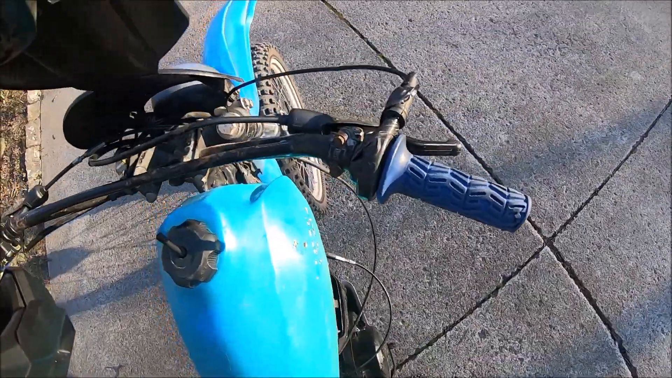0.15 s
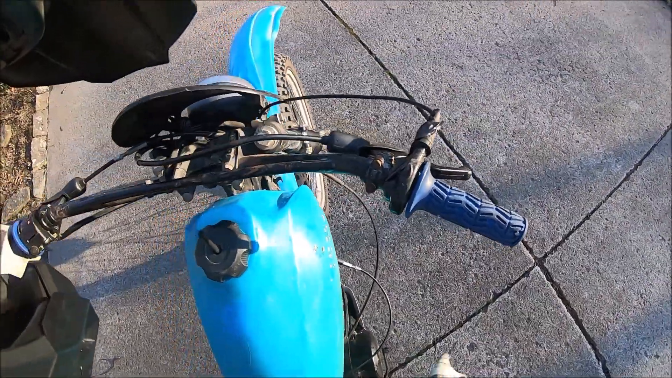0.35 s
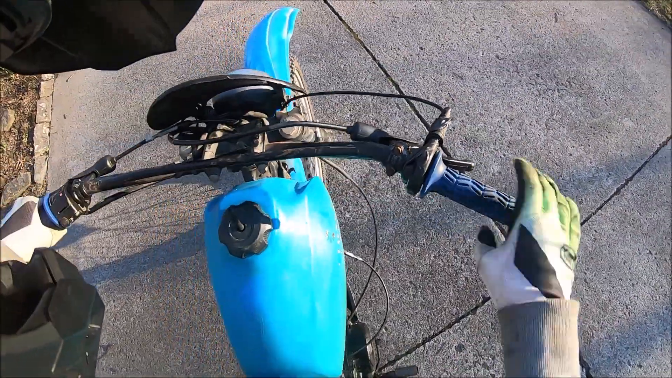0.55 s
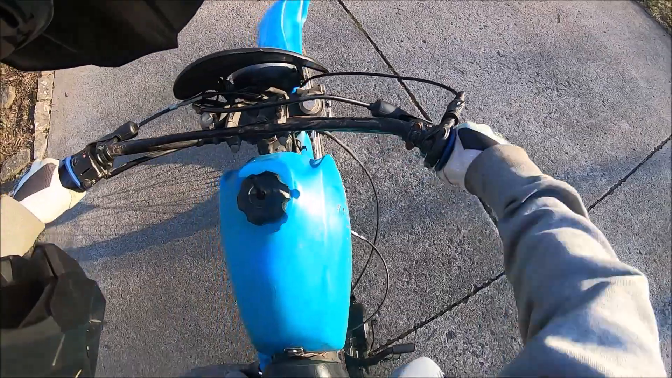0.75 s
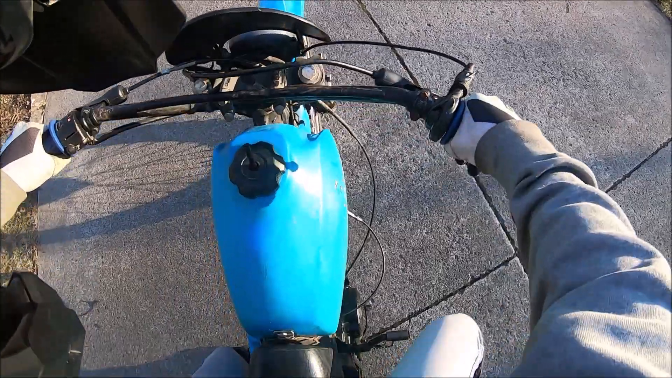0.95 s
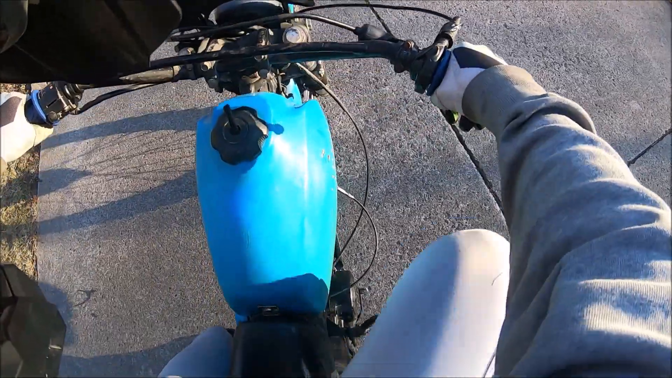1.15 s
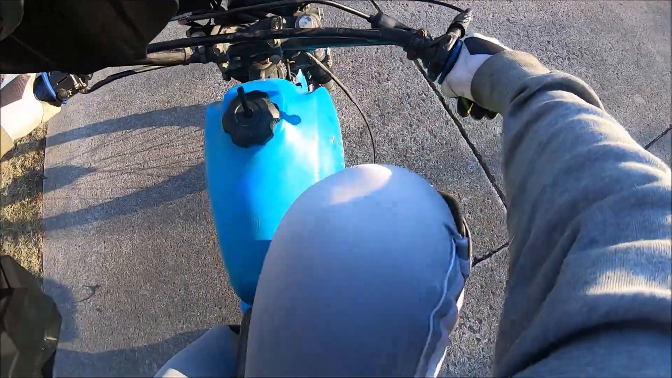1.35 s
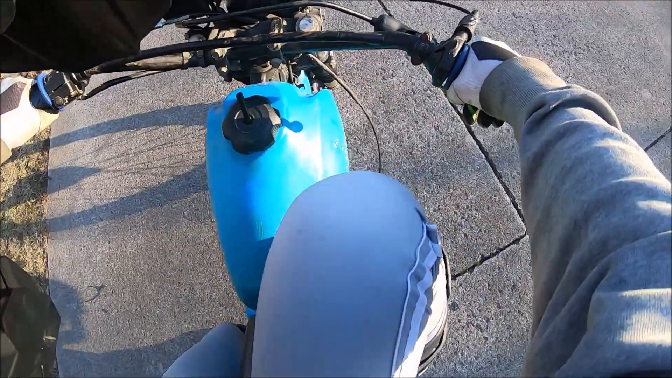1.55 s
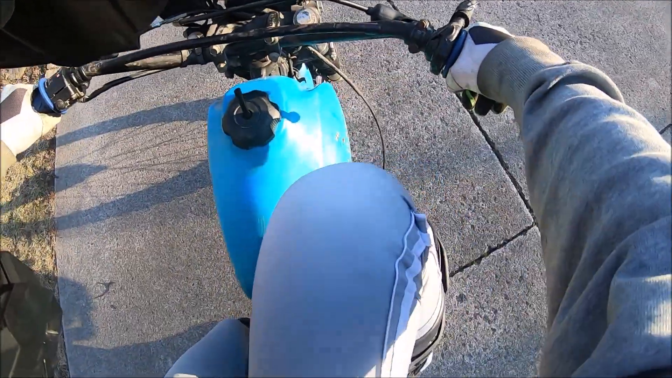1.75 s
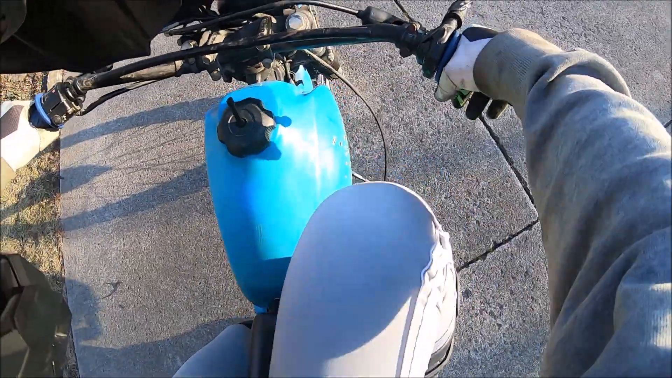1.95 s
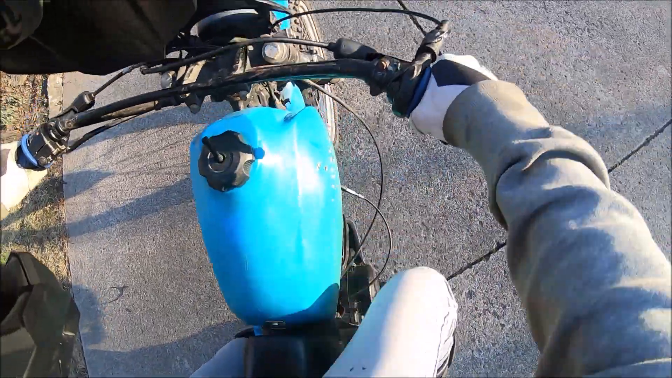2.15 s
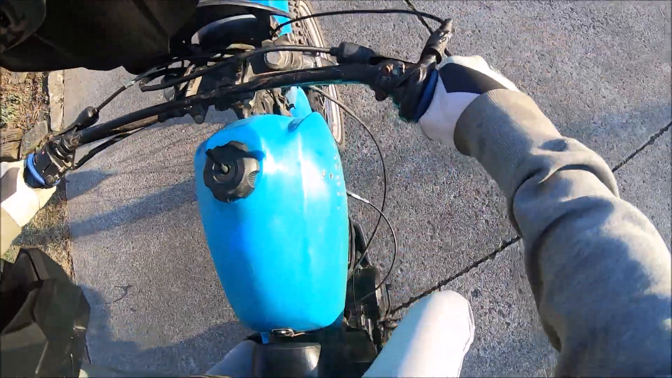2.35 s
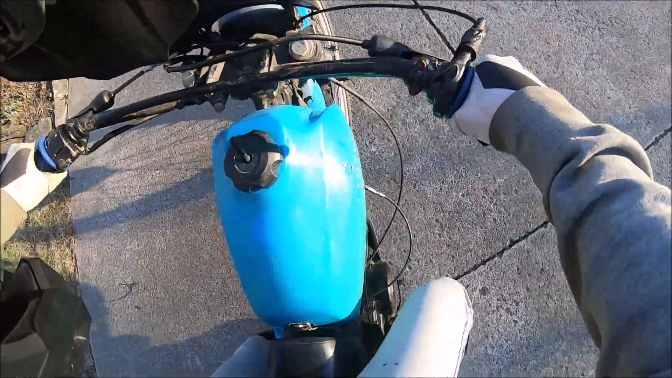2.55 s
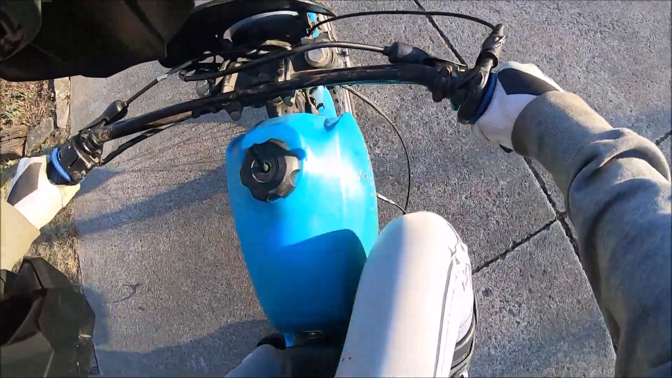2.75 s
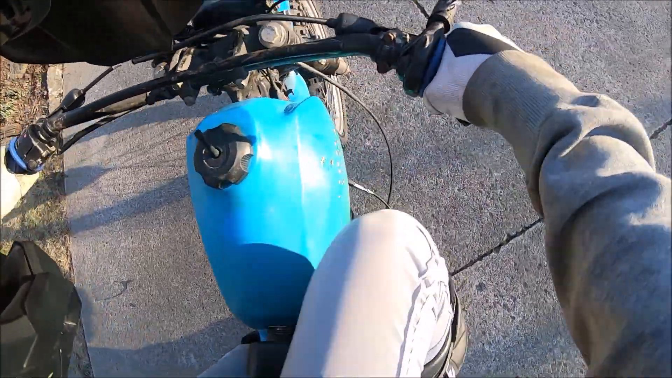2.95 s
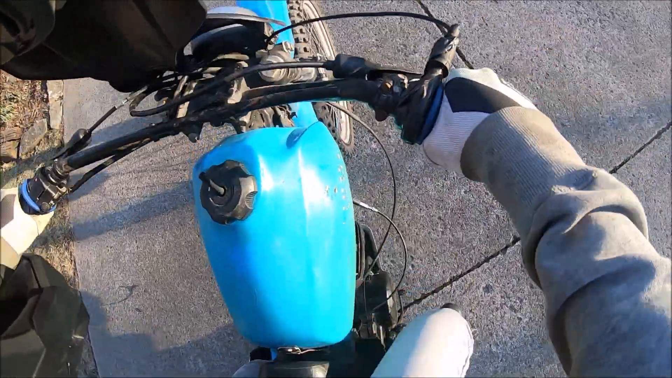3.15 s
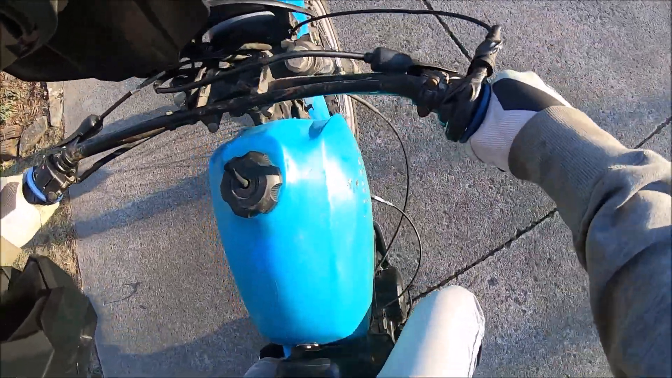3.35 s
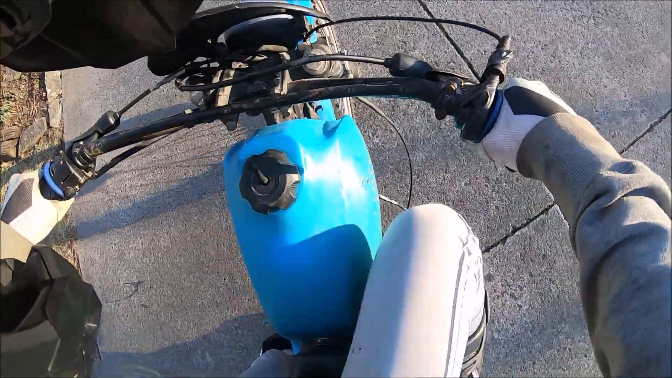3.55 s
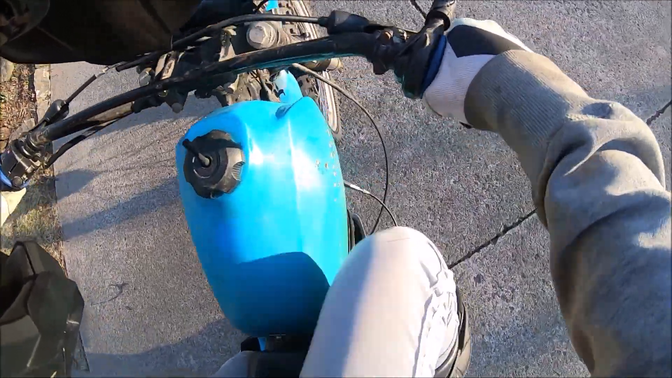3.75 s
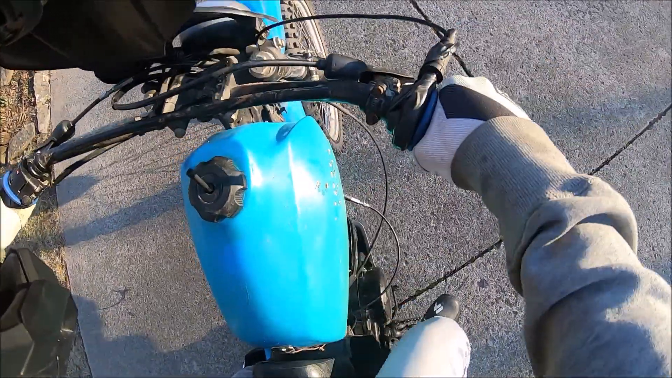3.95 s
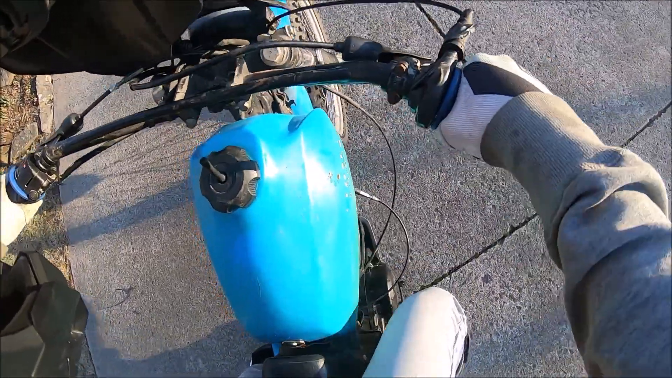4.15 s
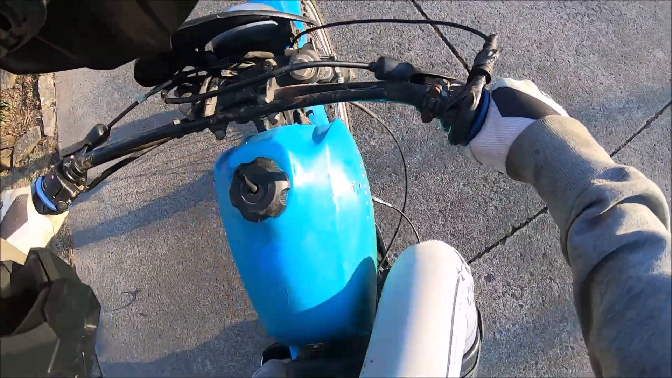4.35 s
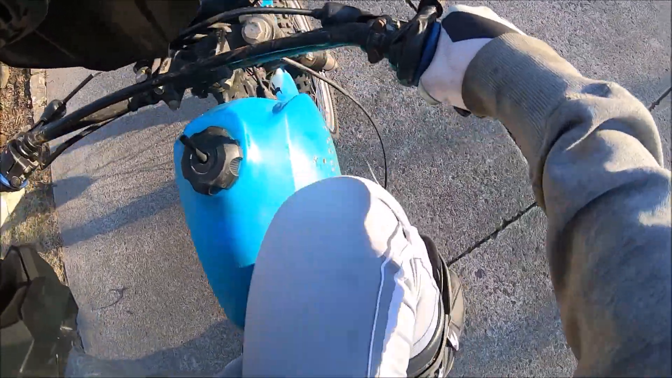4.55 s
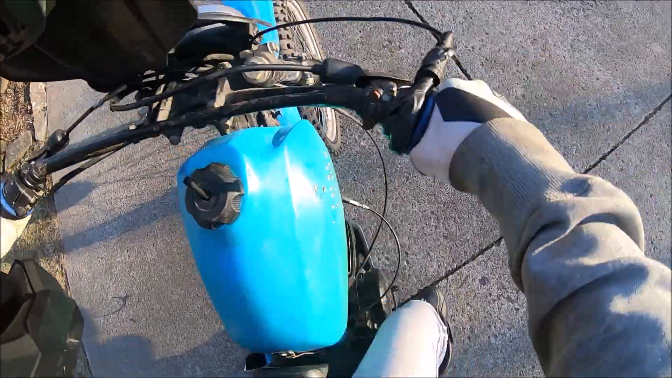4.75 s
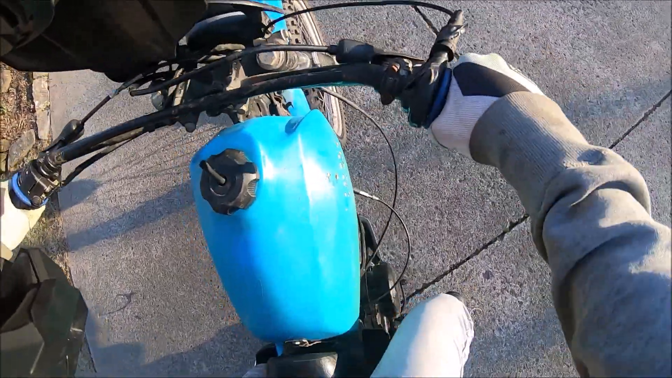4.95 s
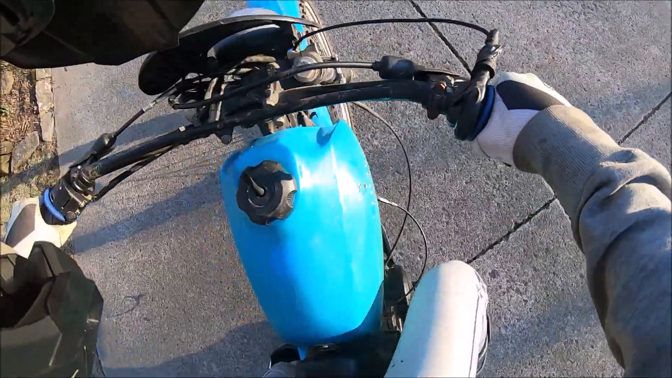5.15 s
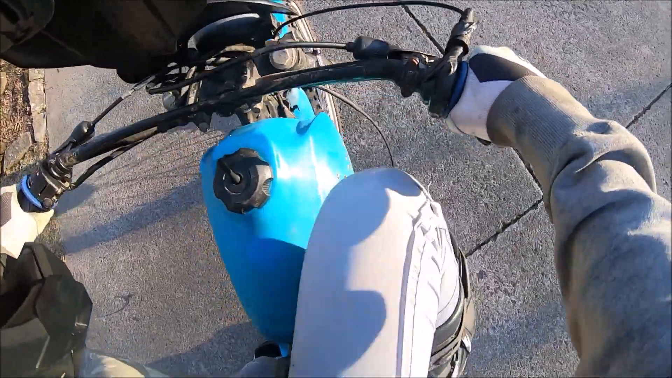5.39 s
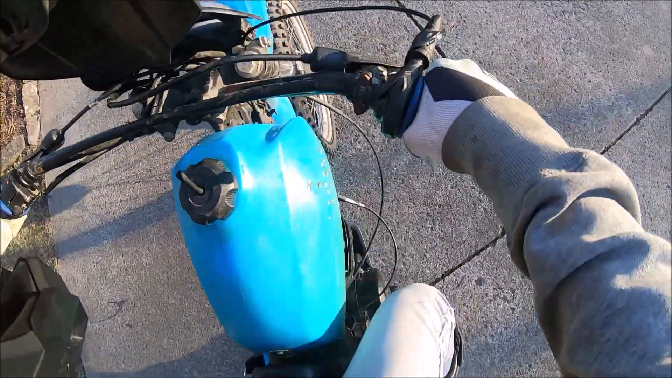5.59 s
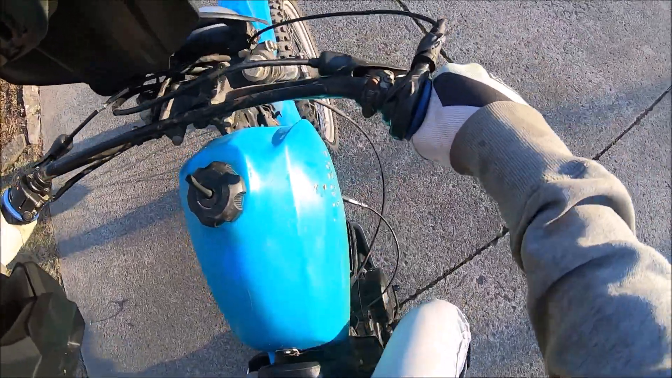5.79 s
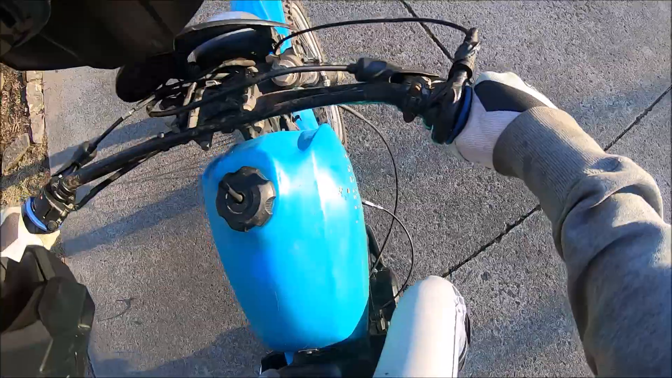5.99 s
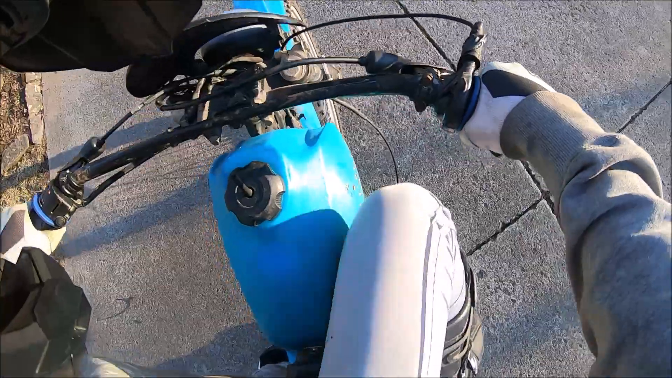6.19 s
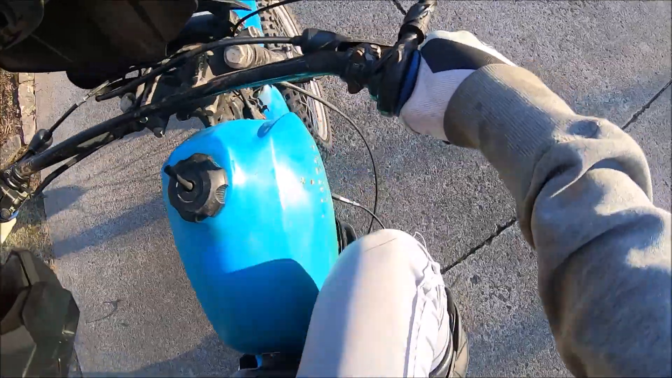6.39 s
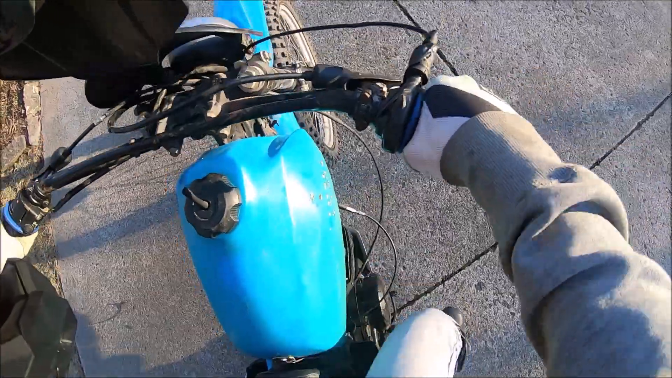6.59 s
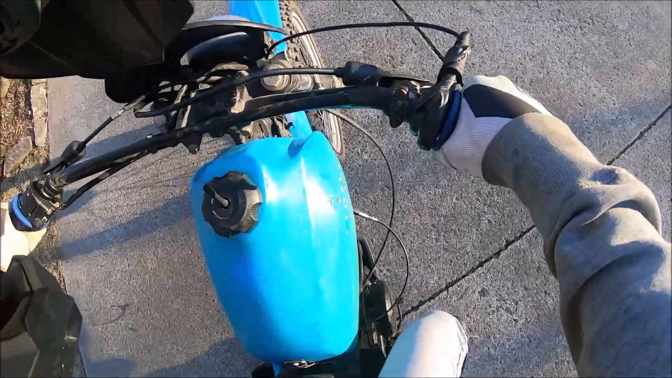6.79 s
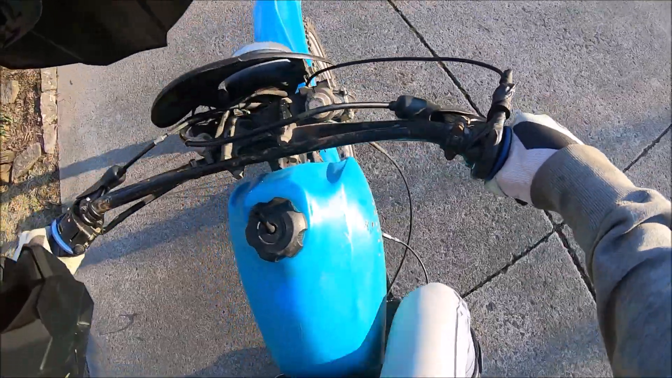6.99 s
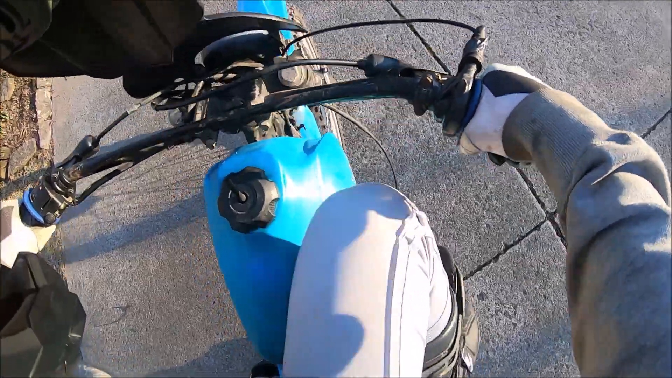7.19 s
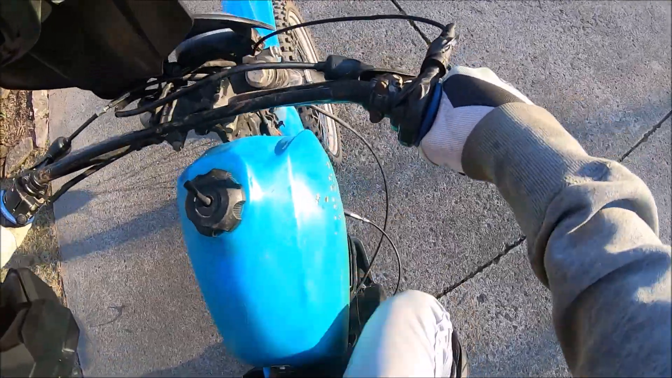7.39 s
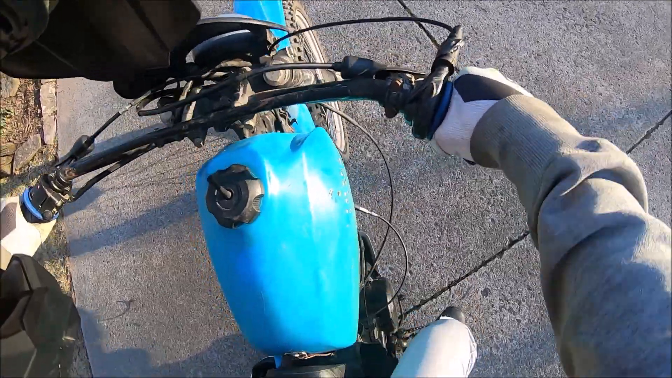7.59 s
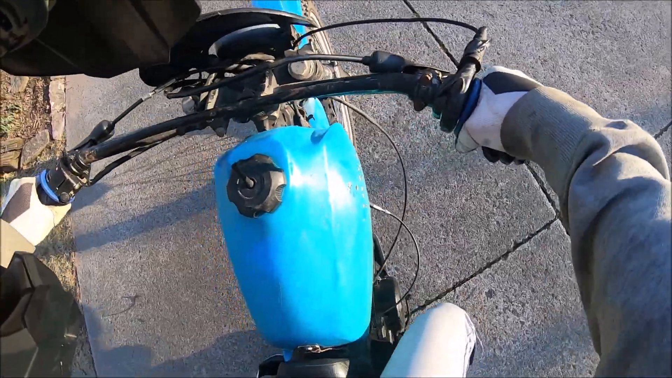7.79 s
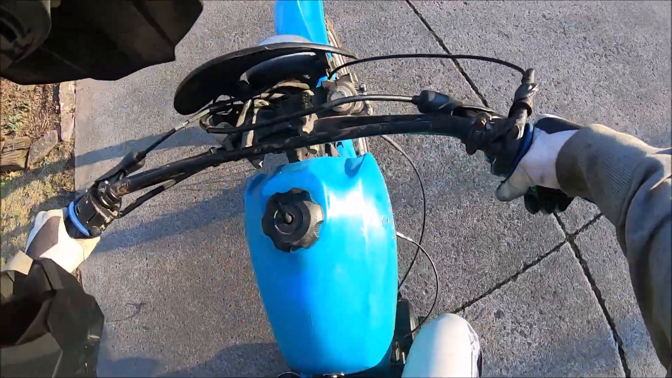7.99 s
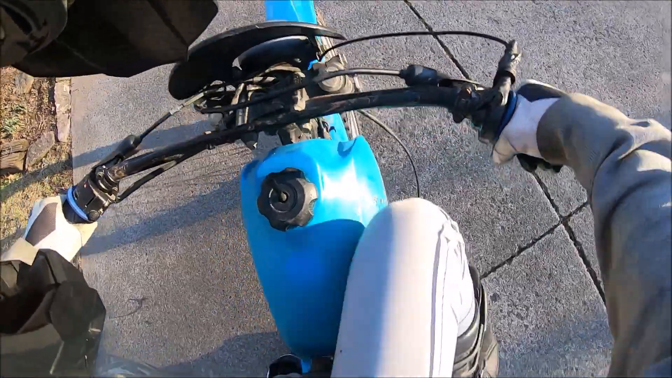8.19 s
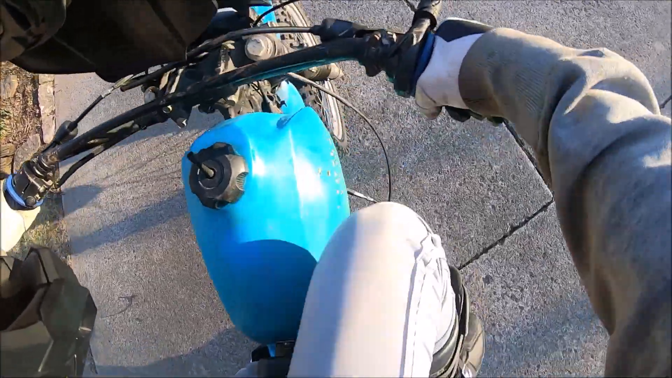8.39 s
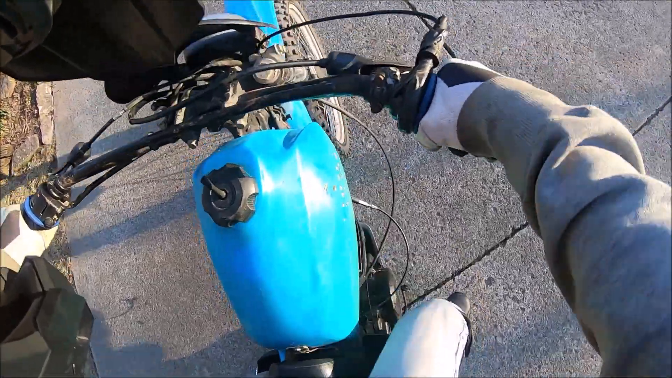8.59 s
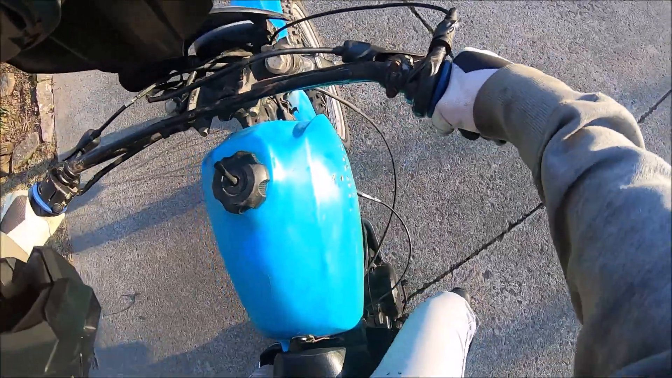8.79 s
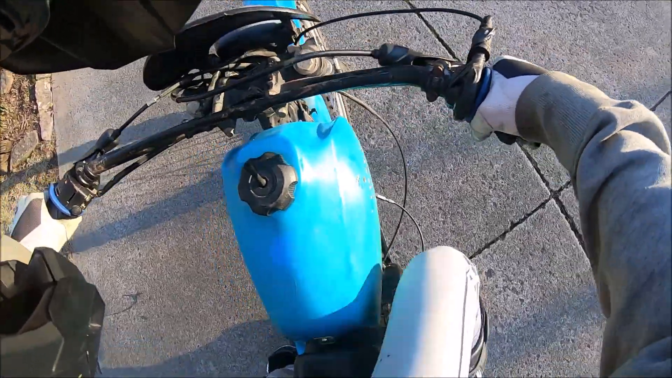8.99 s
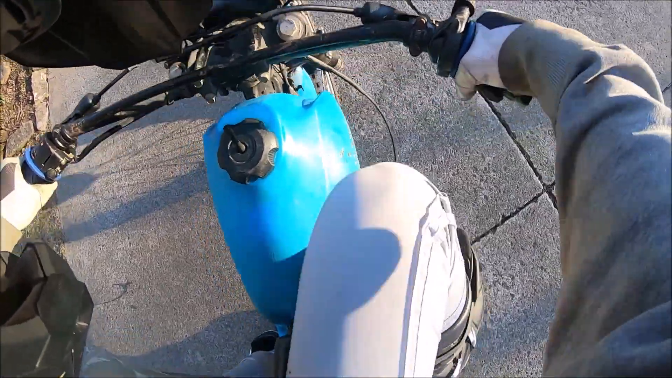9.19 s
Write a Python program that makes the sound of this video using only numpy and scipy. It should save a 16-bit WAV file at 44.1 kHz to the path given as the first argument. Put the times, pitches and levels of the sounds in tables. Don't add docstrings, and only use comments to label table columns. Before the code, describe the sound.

Repeated kick-starter strokes on a small motorcycle: gear grind, hollow exhaust chuffs, sharp steel bang, ratchet clicks on the return, no ignition.

```python
import sys
import numpy as np
from scipy import signal
from scipy.fft import rfft, irfft, next_fast_len
from scipy.io import wavfile
from scipy.ndimage import map_coordinates

SR = 44100
rng = np.random.default_rng(int(sys.argv[2]) if len(sys.argv) > 2 else 0)


def rack_gain(trim_db):
    fader = np.asarray(trim_db, float)
    return 10 ** (fader / 20)


def inscribe(sig):
    pcm = np.round(np.clip(np.atleast_2d(sig).T, -1, 1) * 32767)
    wavfile.write(sys.argv[1], SR, pcm.astype(np.int16))


N = 407250

# [t/s, level/dB]
BREEZE = [(0, -50.5), (.5, -53), (1, -51), (1.3, -43.5), (1.5, -50), (2, -53), (2.7, -59), (4.35, -56),
          (5.35, -63), (6.2, -59.5), (8.1, -63), (8.4, -63), (9.23, -55)]
# [t/s, level/dB]
TRAFFIC = [(0, -57), (.35, -57), (1, -49.5), (1.3, -54), (2.7, -52), (5.35, -54), (8.1, -52.5),
           (9.23, -54.5)]
# [f/Hz, level/dB per Hz]
WIND = [(12, -32.5), (20, -9), (59, -3), (156, -3), (400, -25), (520, -52.5), (880, -120)]
# [f/Hz, level/dB per Hz]
FAR = [(120, -25.5), (200, -6), (525, -6.5), (661, -7), (741, -7.5), (1500, -13.5), (3030, -24),
       (10000, -45.5), (13000, -89.5), (22000, -120)]
# [f/Hz, level/dB per Hz]
CLOTH = [(600, -10), (1500, 8), (2250, -9), (2900, 3.5), (3500, -8), (5500, -16.5), (8500, -12.5),
         (12000, -23.5)]
REACH_S, SWELL_S, HOLD_S, FADE_S, RUSTLE_DB, HUSH_DB = .1, .45, .6, .45, -57.5, 23

# [t/s, peak level/dB, weight (0 light, 1 heavy), favoured f/Hz]
KNOCKS = [(2.2444, -19.5, 0.8, 2070), (2.358, -29, 0.3, 1410), (2.3868, -24, 0.15, 1560),
          (2.42, -33, 0.2, 3080), (3.129, -16.5, 0.1, 1200), (3.3374, -26.5, 0.95, 710),
          (4.0302, -34, 0.05, 2820), (4.0624, -21, 0.3, 1370), (4.1325, -18, 0.1, 1410),
          (4.8908, -26.5, 0.4, 1450), (4.973, -28.5, 0.05, 2940), (5.008, -34, 0.05, 3800),
          (5.0615, -27.5, 0.05, 2340), (5.6444, -26.5, 0.7, 3170), (5.7557, -19.5, 0.1, 1440),
          (5.82, -34, 0.1, 1570), (5.848, -31, 0.15, 3800), (5.908, -36, 0.1, 3670),
          (6.5337, -19, 0.6, 3150), (6.658, -24, 0.5, 1880), (6.76, -32, 0.9, 750),
          (6.7852, -32, 0.95, 1170), (7.432, -26, 0.5, 2070), (7.4506, -16, 0.1, 2080),
          (7.6611, -16.5, 0.7, 720), (7.6725, -19, 0.6, 1400), (7.6968, -12.5, 0.05, 1350),
          (7.7767, -36, 1.05, 1210), (8.533, -18, 0.35, 2680), (8.684, -17.5, 0.3, 1410),
          (8.7094, -20, 0.6, 970), (8.7633, -20.5, 0.6, 2070), (8.7883, -21.5, 0.2, 1660),
          (8.853, -13, 0.02, 3100), (8.8902, -19, 0.02, 2720)]
# [t/s, peak level/dB, weight, favoured
# f/Hz]
BUMPS = [(0.0527, -26, 0.75, 1800), (0.373, -42, 0.35, 1570), (1.5423, -24.5, 0.9, 1170),
         (1.946, -45.5, 1.2, 690), (3.4144, -41, 0.4, 660), (5.0992, -18.5, 0.15, 1340),
         (5.1197, -21, 0.25, 1340), (6.045, -44, 0.8, 730), (6.275, -44, 0.9, 660),
         (6.892, -42, 1.05, 2080), (7.9771, -13.5, 0.02, 1340), (9.1456, -31, 0.5, 1680)]
# [t/s, peak level/dB, favoured f/Hz]
RATTLES = [(0.2833, -45, 1780), (0.8909, -38, 1420), (0.9664, -39, 1580), (1.0216, -37, 1210),
           (1.0424, -39, 1180), (1.1174, -39, 2340), (1.2994, -41, 1990), (1.4484, -39, 1360),
           (1.6342, -40, 1970), (1.9215, -41, 1140), (2.5451, -38, 2160), (2.6204, -42, 1330),
           (2.6998, -41, 1330), (4.5456, -43, 1620), (4.5775, -33, 1130), (6.9194, -44, 1210),
           (6.9681, -43, 1190), (6.988, -42, 2360), (7.2025, -43, 1850), (7.2744, -43, 1740),
           (7.8915, -41, 1390), (7.9144, -48, 1350), (7.9244, -45, 1140), (8.0494, -42, 1590)]
RATTLE_DB, RATTLE_WEIGHT = -6.5, .2
# [low level/dB, treble level/dB, t60/s]
LIGHT = (-14, -6, .035)
# [low level/dB, treble level/dB, t60/s]
HEAVY = (2, -21, .075)
# [low level/dB, treble level/dB, t60/s, favoured f/Hz]
ENGAGING = (2.5, -26, .08, 1200)
# [f/Hz, width/Hz, level/dB]
CASE = [(1184, 25.3, -8), (1344, 40, 1.5), (1666, 112, -5.5), (2068, 36, -2.5), (2800, 17, -13),
        (3127, 43, -4.5), (3800, 12, -61.5), (5830, 43, -8.5), (6580, 48, -9.5)]
# [width/Hz, level/dB]
STRUCK = (150, 3)
TAIL_DB, TAIL_LONGER, TAIL_HZ = -10.5, 2.8, 1600

# [t/s, f/Hz, level/dB]
BIRDS = [
    [(1.11, 2250, -64), (1.14, 2460, -54), (1.17, 2340, -57), (1.2, 2170, -59), (1.3, 2010, -58),
     (1.4, 1960, -57), (1.49, 1920, -60)],
    [(1.3, 1510, -64), (1.4, 1460, -56), (1.45, 1390, -54), (1.5, 1280, -53)],
    [(.28, 1280, -62), (.33, 1215, -61), (.47, 1210, -66)],
    [(.51, 1240, -62), (.62, 1195, -62), (.91, 1185, -63)],
    [(.99, 1290, -62), (1.05, 1160, -62)],
    [(.66, 1400, -64), (.76, 1440, -63), (.8, 1580, -63), (1.03, 1540, -64)],
]
# [t/s, f/Hz, level/dB]
CAW = [(1.16, 511, -75), (1.22, 508, -57), (1.4, 497, -62.5), (1.68, 494, -66)]
# [multiple, level/dB]
CAW_ORDERS = [(2, 2), (4, -3.5), (5, -2), (6, -10.5)]
# [t from its start/s, f/Hz, level/dB]
SONG = [
    [(0, 4400, -3), (.022, 4010, -2), (.05, 3930, -1.5)],
    [(.07, 3600, -4), (.18, 3290, -4), (.29, 2800, 5), (.325, 2780, 7)],
]
# [t/s, level/dB]
SUNG = [(1.797, -64), (2.74, -67), (3.69, -66)]
# [t from its start/s, f/Hz, level/dB]
CHIRP = [(0, 5450, -.5), (.028, 4350, -3)]
# [t/s, level/dB]
CHIRPED = [(1.775, -64), (3.735, -64)]

# [gear engages t/s, engaging knock level/dB, crank stalls t/s, grind level at full speed/dB,
# case rumble level at the stall/dB]
KICKS = [
    (2.138, -31, 2.43, -34.5, -40),
    (3.04, -20, 3.38, -38.5, -46),
    (3.8355, -19.5, 4.15, -37, -39),
    (4.6642, -31.5, 5.03, -38.5, -46),
    (5.5596, -24.5, 5.9, -39, -52),
    (6.4378, -28.5, 6.78, -36.5, -42),
    (7.3554, -27.5, 7.72, -34, -43),
    (8.4274, -25, 8.95, -31.5, -36),
]
FASTEST_AFTER_S, STALL_S, COAST_S, SAG_DB_PER_S = .025, .12, .22, 14
GRIND_SLOW_DB, GRIND_STALL_DB, GRIND_END_DB = -48, -46, -63
RUMBLE_UNDER_DB, RUMBLE_FULL_DB, RUMBLE_SAG, RUMBLE_END_DB = 11.5, -30, .4, -61
HUSHED_DB, HUSHED_S = -6, .045
# [f/Hz, level/dB per Hz]
GRIND = [(240, -27), (400, 7.5), (934, 1.5), (1130, -0.5), (2290, -5.5), (2750, -7), (4000, -19.5),
         (5200, -41), (8800, -120)]
# [f/Hz, level/dB per Hz]
HISS = [(1470, -45), (2500, -13), (2700, -10), (4450, -18), (9670, -31), (15700, -58.5)]
# [f/Hz, level/dB per Hz]
RUMBLE = [(40, -11.5), (95, -10.5), (150, -8.5), (260, -5.5), (400, -11.5), (600, -28.5), (1000, -57.5)]

# [t/s, upper pipe tones level/dB, lowest pipe tone level/dB]
PUFFS = [(2.271, -6, -15.5), (2.38, -14, -14), (3.142, -4.5, -12), (3.237, -14.5, -13), (3.349, -10, -18.5),
         (3.944, -6, -12), (4.024, -13, -13), (4.11, -19, -27.5), (4.788, -3, -13), (5.653, -6, -15),
         (6.543, -6, -15.5), (7.462, -4, -12.5), (7.562, -10, -12.5), (7.668, -5, -12), (7.773, -31, -53),
         (8.543, -6.5, -15.5), (8.632, -14, -10), (8.704, -7, -9.5), (8.773, -5.5, -14.5),
         (8.872, -4, -12.5), (8.957, -23, -25), (9.0, -33, -26)]
# [f/Hz, level/dB, t60/s]
PIPE = [(95.7, 0.5, .12), (258.8, 7, 0.048), (385.6, -0.5, 0.061), (515, -16, 0.12), (178, -13, 0.099)]
FIRST_RING, LATER_RING = .78, .65
NUDGE_AFTER_S, NUDGE_DB, NUDGE_LOW_DB, NUDGE_RING = .004, -21, -45, .8

# [t/s, peak level/dB, low
# level/dB, length/s, favoured f/Hz]
GULPS = [(2.1947, -16, -2.5, 0.043, 2770), (3.07, -14, -2, 0.044, 1120), (3.247, -19.5, -27, 0.035, 3180),
         (3.2765, -19.5, -40, 0.025, 2810), (3.3353, -23, 6.5, 0.04, 700), (3.8854, -12, -3, 0.046, 2790),
         (3.993, -21.5, -21, 0.024, 2370), (4.048, -18, -22, 0.039, 3080),
         (4.0962, -15.5, 0.5, 0.053, 1350), (4.7136, -21, -2.5, 0.047, 2850),
         (5.5826, -19, -3.5, 0.025, 3500), (6.4617, -22, 1.5, 0.025, 1110), (7.378, -22, 4, 0.025, 1590),
         (7.5806, -13.5, -9, 0.04, 3050), (8.1937, -31, 0.2, 0.1, 720), (8.4525, -23, 4.5, 0.032, 1550),
         (8.666, -18, -12, 0.02, 2650), (8.73, -10.5, -14, 0.036, 2780), (8.8036, -10, -31, 0.025, 2680),
         (8.9057, -15.5, -27, 0.043, 2800), (8.9562, -24, 7, 0.034, 1310)]
STARTING_TREBLE_DB, SPINNING_TREBLE_DB = -19, -12
CHARGE_LEAD_S = .031
CHARGE = -15.5, 3, -21, .044, 2070
# [low level/dB, treble level/dB, length/s, favoured f/Hz]
SQUEEZED = (-11, -15, .035, 2720)
# [f/Hz, width/Hz, level/dB]
INTAKE = [(1200, 150, -2), (1600, 90, -2), (2050, 90, -2), (2800, 90, 5), (3500, 130, -2), (5800, 250, 5),
          (6600, 150, 5), (7300, 200, 4), (9800, 600, 5)]
# [width/Hz, level/dB]
BLOWN = (120, 7)

# [t/s, peak level/dB, thud level/dB, level of air squeezed out before/dB, its lead/s]
BANGS = [
    (2.3011, -6, -6, -40, .025),
    (3.1767, -5.5, -13, -14.5, .022),
    (3.9545, -6, -13, -40, .025),
    (4.8309, -4, -9.5, -18.5, .021),
    (5.7062, -5.5, -9.5, -9.5, .02),
    (6.5978, -9, -11.5, -12, .026),
    (7.5262, -10.5, -13, -9, .029),
    (8.6148, -8.5, -8, -8, .031),
]
# [low modes level/dB, middle modes level/dB, high modes level/dB]
LANDINGS = [(3, -2, -4), (-1, -2, 0), (-3, -2, 0), (-1, 2, 1), (-1, 2, -2), (2, 3, -8), (2, 2, -11),
            (1, 1, -11)]
# [f/Hz, level/dB, t60/s]
STOP = [(1375, -1.5, .045), (1870, -4, .02), (2350, -5, .018), (2900, -5, .018), (3640, 5, .019),
        (4300, -3, .012), (7050, -15, .015), (9200, -18, .015)]
# [f/Hz, level/dB, t60/s]
FRAME = [(272, 8, 0.041), (105.6, -2, 0.1)]
FIRST_CONTACT = 14

# [peak level/dB, t/s of each tooth]
PAWL = [
    (-26.5, 2.7312, 2.797, 2.8814),
    (-27.5, 3.5638, 3.6576),
    (-27, 4.4144, 4.4922, 4.6009),
    (-28.5, 5.252, 5.3298, 5.4261),
    (-26.5, 6.1384, 6.2133, 6.3116),
    (-25.5, 7.0623, 7.1417, 7.2424),
    (-24, 8.113, 8.1753, 8.2477, 8.3404),
]
# [level/dB, low level/dB]
TEETH = [(-2.5, -7), (-1.5, -10), (-1.5, -5), (-3.5, -5.5)]
TOOTH_HZ = [3180, 1710, 1710, 3180]
TOOTH_TREBLE_DB, TOOTH_T60_S = -9, .045
# [f/Hz, width/Hz, level/dB]
RATCHET = [(716, 200, -6), (1280, 200, -3), (1710, 130, -8), (3180, 200, -5), (4280, 110, -10),
           (5290, 160, -9), (6030, 120, -8)]

# [t/s, first mode level/dB, second mode level/dB]
SHIELD = [(3.128, -57, -30.5), (3.932, -60, -28), (3.99, -48, -60), (4.12, -52, -56), (4.85, -50, -56),
          (4.93, -50, -58), (4.965, -52, -47), (6.67, -50, -60), (5.822, -45, -48), (7.53, -42, -55),
          (7.7, -55, -63)]
# [f/Hz, level/dB, t60/s]
SHEET = [(5725, -2.5, 0.6), (7685, -1, .2), (10400, -5, .15)]
# [t/s, f/Hz, #
# level/dB, t60/s]
SPRING = [(3.355, 662, -36, .34), (3.36, 1585, -46, .6), (4.15, 1250, -48, .4), (4.3, 1780, -54, .4),
          (5.84, 1588, -46, .5), (6.787, 1200, -38, .15), (7.7, 1330, -38, .2), (7.77, 1590, -48, .5),
          (8.195, 2300, -44, .3)]

# [f/Hz, level/dB]
WIDTH = [(30, -5.5), (80, -19), (300, -23.5), (700, -10.5), (1300, -4.5), (4000, -6), (9000, 2)]
# [f/Hz, share of mid]
LEAN = [(200, 0.012), (1000, 0.085), (5000, 0.14), (12000, .1)]
# [f/Hz, level/dB]
MICROPHONE = [(30, 3), (10300, 0), (11200, -15.5), (15000, -10), (16000, -26.5)]


def unit(x):
    return x / np.sqrt(np.mean(x ** 2) + 1e-20)


def along(points, hz):
    f, v = np.transpose(points)
    return np.interp(np.log(hz + 1), np.log(f + 1), v)


def curves(rows, outside=None):
    s, *columns = np.transpose(rows)
    t = np.arange(N) / SR
    return [np.interp(t, s, column, outside, outside) for column in columns]


def wobble(rate):
    coarse = np.arange(0, N + 16, 16)
    knots = rng.standard_normal(int(N * rate / SR) + 4)
    return np.interp(np.arange(N), coarse, map_coordinates(knots, [coarse * rate / SR]))


def filtered(x, response):
    n = x.shape[-1]
    m = next_fast_len(n + 2048)
    return irfft(rfft(x, m) * response(np.fft.rfftfreq(m, 1 / SR)), m)[..., :n]


def noise(spectrum, grain_db=0, rate=300):
    pair = rng.standard_normal((2, N)) * rack_gain(grain_db * wobble(rate))
    return unit(filtered(pair, lambda hz: rack_gain(along(spectrum, hz))))


def add(out, s, piece):
    i = round(s * SR)
    out[:, i:i + piece.shape[1]] += piece[:, :N - i]


def ring(modes, t, levels_db, stretch=0.83, attack=.001):
    total = np.zeros(len(t))
    for (hz, db, t60), more_db in zip(modes, levels_db):
        total += rack_gain(db + more_db - 60 * t / (t60 * stretch)) * np.sin(2 * np.pi * hz * t)
    return total * (1 - np.exp(-t / attack))


def resonant(peaks, f, flat=0.33, more_db=0):
    centre, width, db = np.transpose(peaks)[:, :, None]
    signs = (-1) ** np.arange(len(peaks))[:, None]
    damping = 1j * f * width
    peak = damping / (centre * centre - f * f + damping)
    return flat + np.sum(signs * rack_gain(db + more_db) * peak, axis=0)


def colour(low_db, treble_db, hz):
    points = [(100, 2 * low_db - 13), (300, 2 * low_db + 12.5), (900, low_db + 10.5), (1400, 0.02), (3600, 0),
              (5400, treble_db), (10000, treble_db - 13), (16000, treble_db - 25)]
    return rack_gain(along(points, hz))


def surroundings():
    (wind_db,), (far_db,) = curves(BREEZE), curves(TRAFFIC)
    times = np.cumsum([REACH_S, SWELL_S, HOLD_S, FADE_S])
    rustle_db, = curves(np.c_[times, RUSTLE_DB - HUSH_DB * np.array([1, 0, 0, 1])], outside=-120)
    wind = rack_gain(wind_db + 4.0 + 2.3 * wobble(9)) * noise(WIND)
    far = rack_gain(far_db + 0.45 * wobble(6)) * noise(FAR, grain_db=0.53, rate=120)
    rustle = rack_gain(rustle_db + 2.4 * wobble(22)) * noise(CLOTH, grain_db=3, rate=230)
    return wind + far + rustle


def strike(out, row, body):
    s, db, low_db, treble_db, t60, tone_hz = row
    t = np.arange(SR // 10) / SR
    fall_db = -60 * t / t60
    decays = rack_gain([[fall_db], [TAIL_DB + fall_db / TAIL_LONGER]])
    parts = rng.standard_normal((2, 2, len(t))) * [[1], [.7]] * decays * (1 - np.exp(-t / 0.0018))
    place_db = rng.normal(0, 2.5, (len(body), 1))

    def response(hz):
        dulling = np.array([[1 + 0 * hz], [1 + (hz / TAIL_HZ) ** 4]])
        rung = colour(low_db, treble_db, hz) * resonant(body, hz, 0.42, place_db)
        return (rung + resonant([(tone_hz, *STRUCK)], hz, 0)) / dulling

    add(out, s - .001, rack_gain(db + 11) * filtered(parts, response).sum(axis=0))


def blows():
    rattles = [(s, db + RATTLE_DB, RATTLE_WEIGHT, hz) for s, db, hz in RATTLES]
    rows = []
    for s, db, weight, hz in KNOCKS + BUMPS + rattles:
        rows.append((s, db, *(np.array(LIGHT) + weight * np.subtract(HEAVY, LIGHT)), hz))
    return rows + [(s, db - 1.5, *ENGAGING) for s, db, *_ in KICKS]


def knocks():
    out = np.zeros((2, N))
    for row in blows():
        strike(out, row, CASE)
    return out


def whistle(rows, orders, waver, flutter):
    s, hz, db = np.transpose(rows)
    span = np.arange(round(s[0] * SR), round(s[-1] * SR))
    t = span / SR
    phase = 2 * np.pi * np.cumsum(np.interp(t, s, hz) * (1 + waver[span])) / SR
    edges = signal.windows.tukey(len(span), min(1, 900 / len(span)))
    gain = rack_gain(np.interp(t, s, db)) * flutter[span] * edges
    return np.sqrt(2) * gain * sum(rack_gain(level) * np.sin(k * phase) for k, level in orders)


def birds():
    out, waver, flutter = np.zeros((2, N)), .008 * wobble(70), rack_gain(1.6 * wobble(50))
    sung = [(note, when) for note in SONG for when in SUNG] + [(CHIRP, when) for when in CHIRPED]
    calls = BIRDS + [np.add(note, (s, 0, db)) for note, (s, db) in sung]
    for rows, orders in [(call, [(1, 0)]) for call in calls] + [(CAW, CAW_ORDERS)]:
        add(out, rows[0][0], whistle(rows, orders, waver, flutter) * [[1], [.3]])
    return out


def turning(engage_s, knock_db, stall_s, full_db, stall_db, lands_s):
    fastest_s = lands_s + FASTEST_AFTER_S
    spin_s = max(stall_s - STALL_S - fastest_s, 1 / SR)
    sagged_db = full_db - SAG_DB_PER_S * spin_s
    rumble_db = RUMBLE_FULL_DB + RUMBLE_SAG * (stall_db - RUMBLE_FULL_DB)
    return [(engage_s, GRIND_SLOW_DB, knock_db - RUMBLE_UNDER_DB),
            (fastest_s, full_db, RUMBLE_FULL_DB),
            (fastest_s + spin_s, sagged_db, rumble_db),
            (stall_s, GRIND_STALL_DB, stall_db),
            (stall_s + COAST_S, GRIND_END_DB, RUMBLE_END_DB)]


def unloading():
    dip = [(0, 0), (.2, HUSHED_DB), (.7, HUSHED_DB), (1, 0)]  # (share of HUSHED_S, dB)
    corners = [(s + share * HUSHED_S, db) for s, *_ in PUFFS for share, db in dip]
    return curves(sorted(corners))[0]


def crank():
    kicks = [curves(turning(*kick, bang[0]), outside=-120) for kick, bang in zip(KICKS, BANGS)]
    grind_db, rumble_db = np.max(kicks, axis=0)
    teeth = unit(filtered(noise(GRIND, grain_db=3.5, rate=170), lambda hz: resonant(CASE, hz)))
    hiss_db = -6.5 + 0.17 * (grind_db + 40.5) + 4.4 * wobble(35)
    hiss = rack_gain(hiss_db) * noise(HISS, grain_db=3.0, rate=120)
    gears = rack_gain(grind_db + unloading()) * (rack_gain(4.2 * wobble(40)) * teeth + hiss)
    return gears + rack_gain(rumble_db + 3.6 * wobble(25)) * noise(RUMBLE)


def first_puffs():
    return [min(s for s, *_ in PUFFS if s > kick[0]) for kick in KICKS]


def exhaust():
    out, t, first = np.zeros((2, N)), np.arange(SR // 5) / SR, first_puffs()
    puffs = [(s, db, low_db, FIRST_RING if s in first else LATER_RING) for s, db, low_db in PUFFS]
    puffs += [(kick[0] + NUDGE_AFTER_S, NUDGE_DB, NUDGE_LOW_DB, NUDGE_RING) for kick in KICKS]
    for s, db, low_db, stretch in puffs:
        chance_db = rng.normal(0, 1.2, len(PIPE))
        puff = ring(PIPE, t, chance_db + [low_db - db + 5.0, 0, 0, 0, 0], stretch, attack=0.0075)
        echo = ring(PIPE[1:], t, chance_db[1:] - 6, stretch, attack=0.0034)
        add(out, s + 0.00306, rack_gain(db + 1.0) * puff * [[1], [.3]])
        add(out, s + 0.01606, rack_gain(db - 3.5) * echo * [[1], [.3]])
    return out


def flows():
    first = first_puffs()
    rows = []
    for s, db, low_db, *rest in GULPS:
        starting = any(kick[0] < s < puff_s for kick, puff_s in zip(KICKS, first))
        rows.append((s, db, low_db, STARTING_TREBLE_DB if starting else SPINNING_TREBLE_DB, *rest))
    rows += [(s - CHARGE_LEAD_S, *CHARGE) for s in first]
    return rows + [(s - lead_s, db, *SQUEEZED) for s, _, _, db, lead_s in BANGS]


def gulps():
    out, t = np.zeros((2, N)), np.arange(SR // 10) / SR
    flutter = rack_gain(2.5 * wobble(220))
    for s, db, low_db, treble_db, length, tone_hz in flows():
        opening = np.sin(np.pi * np.clip(t / length, 0, 1) ** 0.66) * flutter[round(s * SR):][:len(t)]
        drift, place_db = rng.normal(1, .02), rng.normal(-2, 2, (len(INTAKE), 1))
        flow = rng.standard_normal((2, len(t))) * opening * [[1], [.7]]

        def response(hz):
            intake = colour(low_db, treble_db, hz) * resonant(INTAKE, hz * drift, 0.3, place_db)
            return intake + resonant([(tone_hz, *BLOWN)], hz, 0)

        add(out, s, rack_gain(db - 3.0) * filtered(flow, response))
    return out


def bangs():
    out, t = np.zeros((2, N)), np.arange(SR // 8) / SR
    for (s, db, thud_db, *_), landing_db in zip(BANGS, LANDINGS):
        levels_db = rng.normal(0, 1, len(STOP)) + np.repeat(landing_db, [1, 3, 4])
        steel = ring(STOP, t, levels_db, stretch=.66, attack=0.000071)
        envelope = rack_gain(-60 * t / 0.03) * (1 - np.exp(-t / 0.0008))
        chatter = rng.standard_normal((2, len(t))) * envelope * [[1], [.5]]
        rung = signal.fftconvolve(chatter, steel[None], axes=1)[:, :len(t)]
        rung += FIRST_CONTACT * np.roll(steel, 30) * [[1], [.5]]
        crack = filtered(chatter, lambda hz: colour(-22, landing_db[2] - 5, hz))
        thud = ring(FRAME, t, [thud_db, thud_db], attack=0.0044)
        add(out, s - .001, rack_gain(db) * (.85 * rung / np.abs(rung).max() + 2.2 * crack + 1.56 * thud))
    return out


def ratchet():
    out = np.zeros((2, N))
    for db, *times in PAWL:
        for s, (gain_db, low_db), tone_hz in zip(times, TEETH[-len(times):], TOOTH_HZ):
            strike(out, (s, db + gain_db, low_db, TOOTH_TREBLE_DB, TOOTH_T60_S, tone_hz), RATCHET)
    return out


def shield():
    out, t = np.zeros((2, N)), np.arange(SR // 8) / SR
    settle = np.clip((.11 - t) / .02, 0, 1)
    for s, first_db, second_db in SHIELD:
        buzz = ring(SHEET, t, [first_db, second_db, min(first_db, second_db)], attack=0.0018)
        add(out, s, settle * buzz * [[1], [.7]])
    return out * rack_gain(3 * wobble(120))


def spring():
    out, t = np.zeros((2, N)), np.arange(SR // 4) / SR
    fade = np.clip((.25 - t) / .05, 0, 1)
    for s, *mode in SPRING:
        add(out, s, ring([mode], t, [0], attack=.006) * fade * [[1], [.7]])
    return out * rack_gain(3 + 4 * wobble(90))


def scene():
    engine = knocks() + crank() + exhaust() + gulps() + bangs() + ratchet() + shield() + spring()
    mid, side = surroundings() + engine
    song = birds()
    mid = mid + song[0]
    side = filtered(side, lambda hz: rack_gain(along(WIDTH, hz))) + song[1]
    lean = filtered(mid, lambda hz: along(LEAN, hz))
    return np.array([mid + side + lean, mid - side - lean])


def top_cut(x):
    return signal.sosfilt(signal.butter(12, 16310, fs=SR, output="sos"), x)


def record(dry):
    heard = filtered(dry, lambda hz: rack_gain(along(MICROPHONE, hz)))
    held = heard / (1 + np.abs(heard / 1.05) ** 6) ** (1 / 6)
    return top_cut(held)


dry = scene()
out = record(dry)
inscribe(out)
```